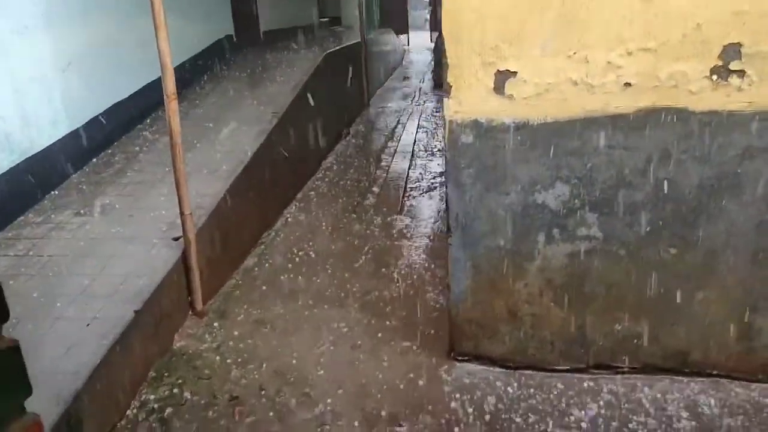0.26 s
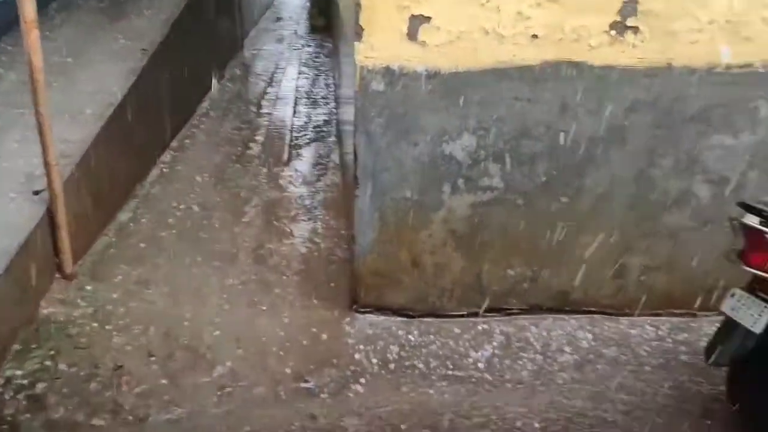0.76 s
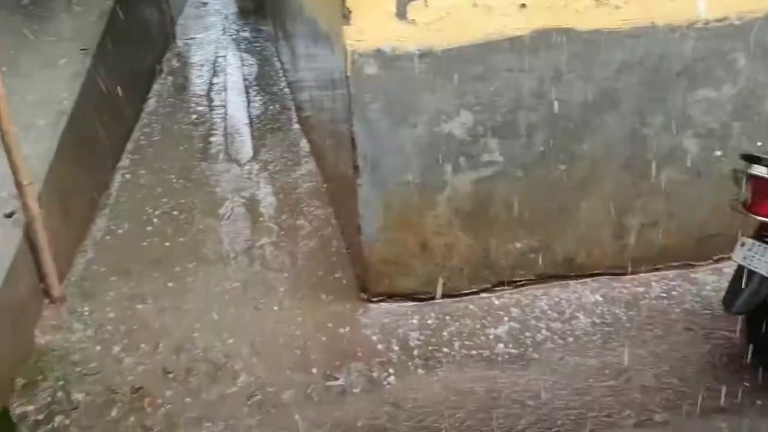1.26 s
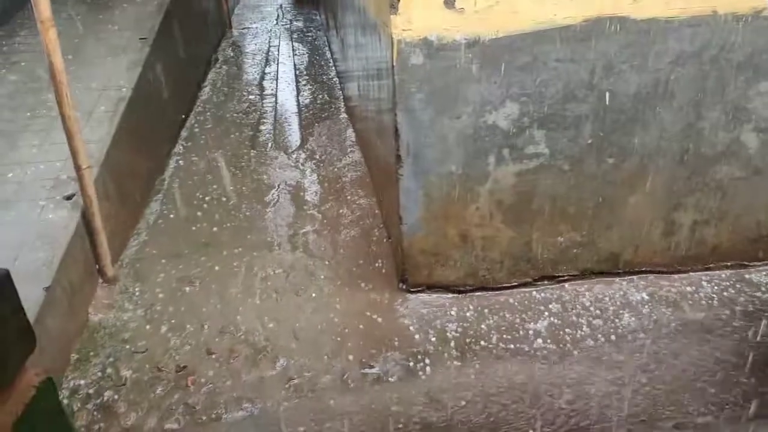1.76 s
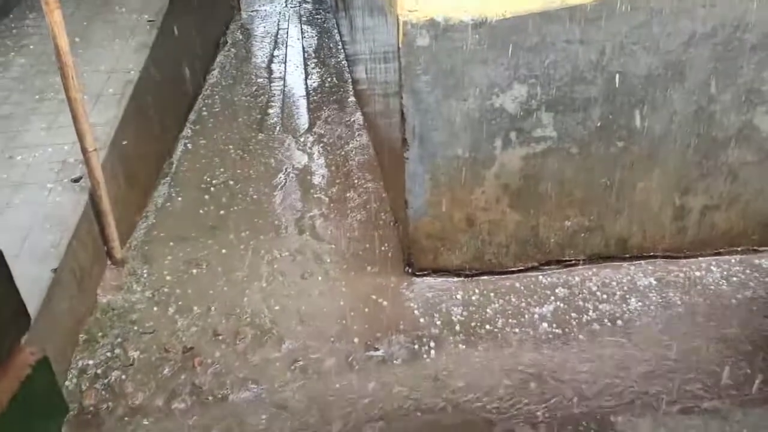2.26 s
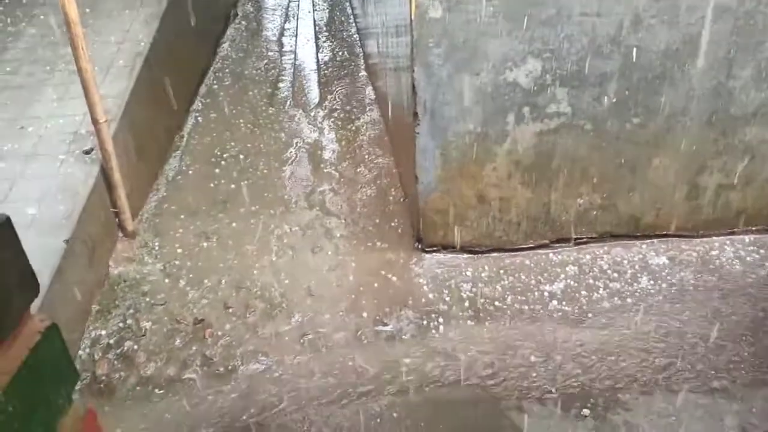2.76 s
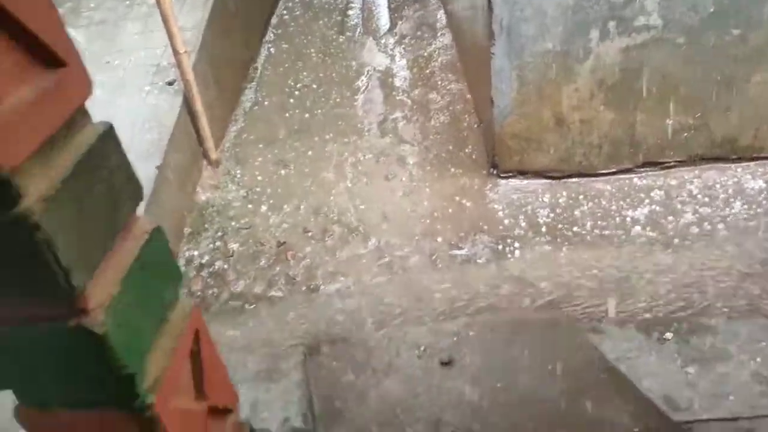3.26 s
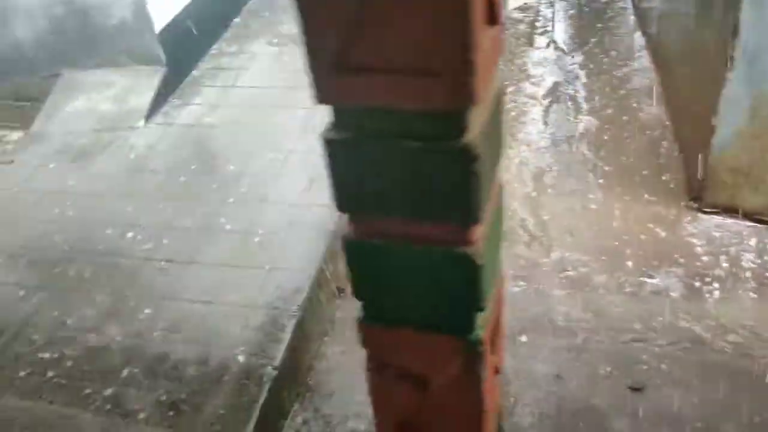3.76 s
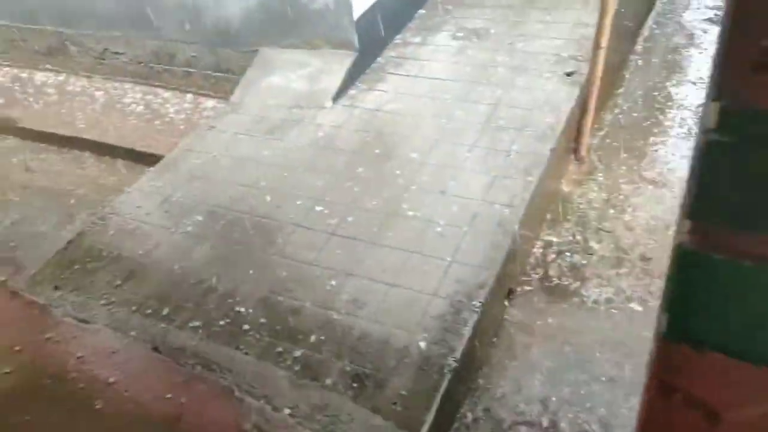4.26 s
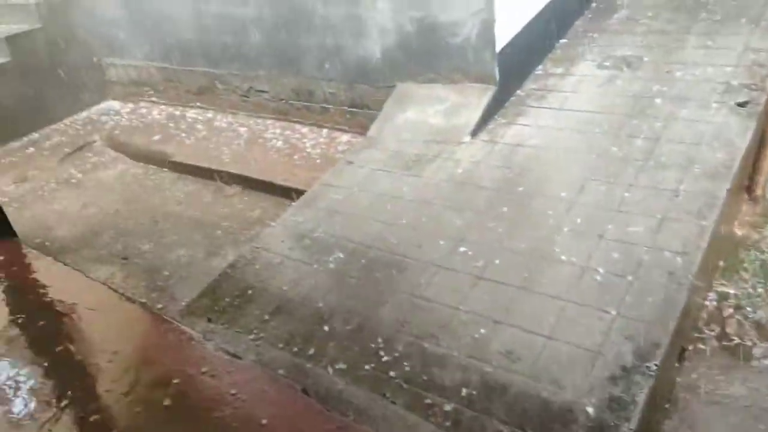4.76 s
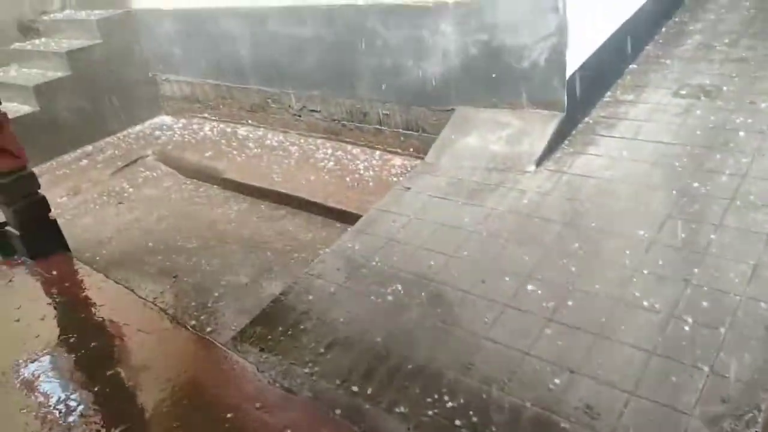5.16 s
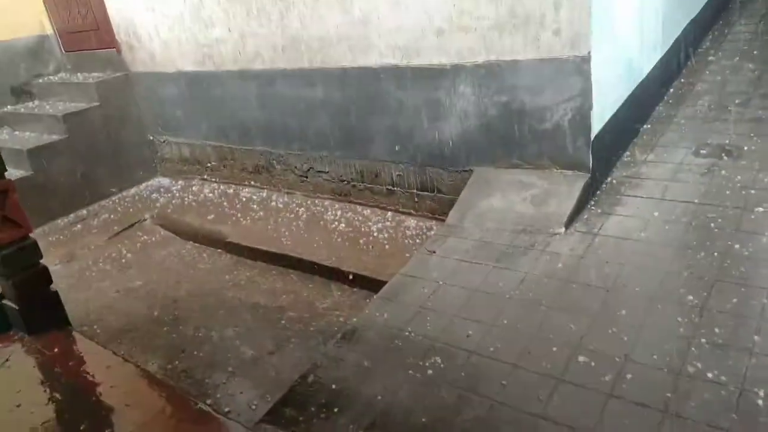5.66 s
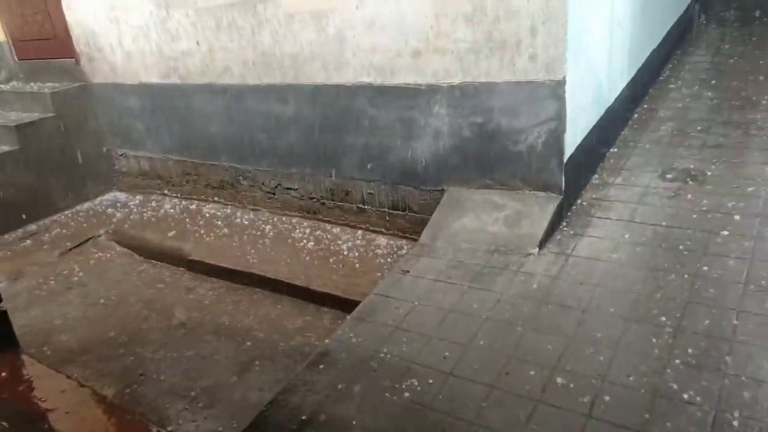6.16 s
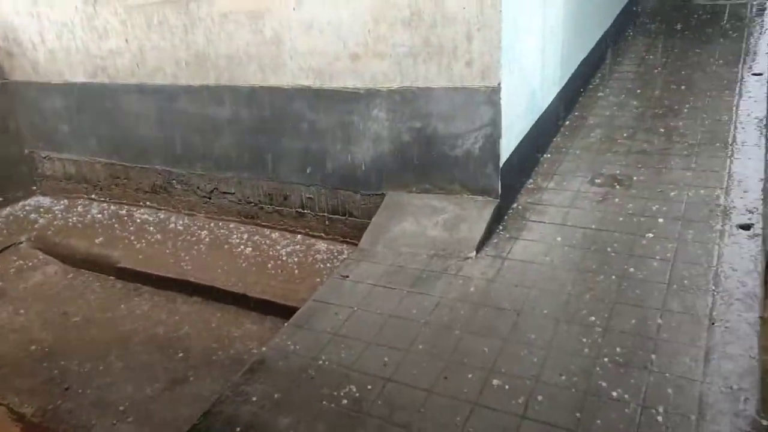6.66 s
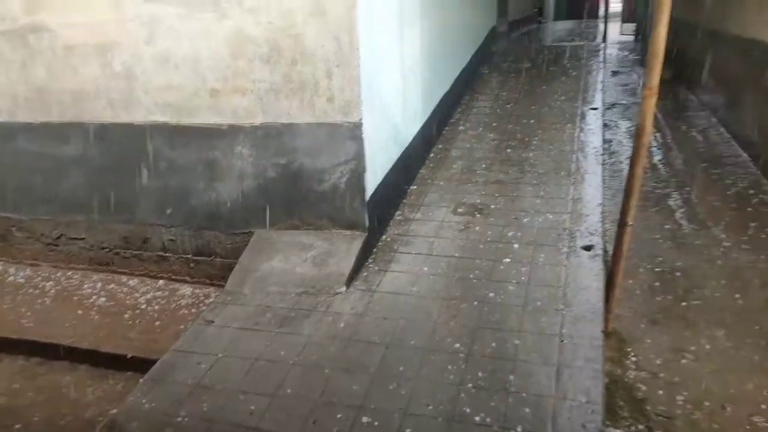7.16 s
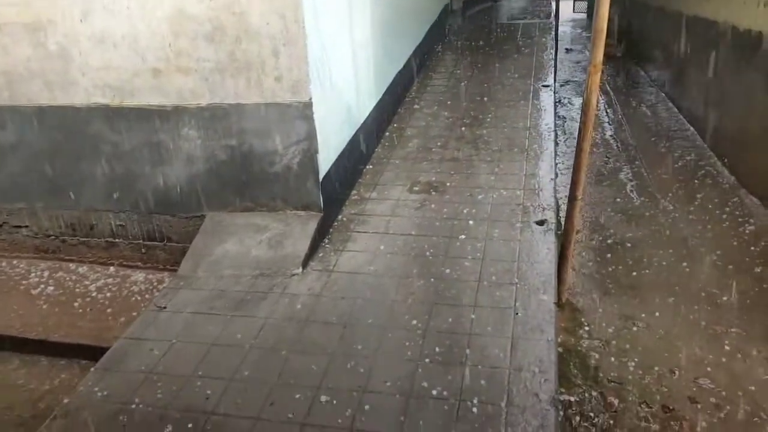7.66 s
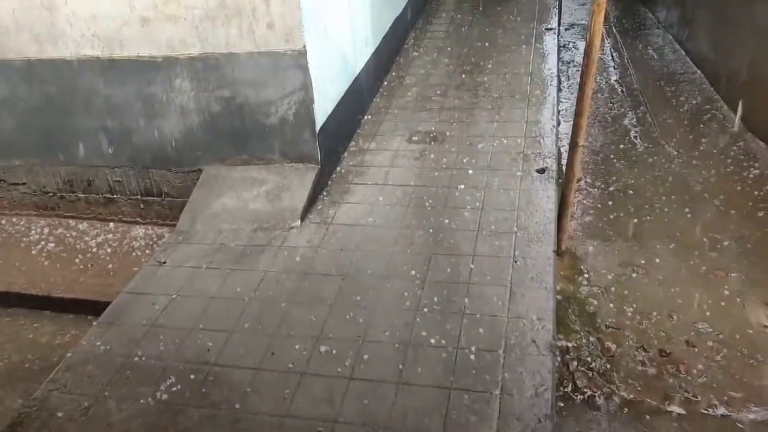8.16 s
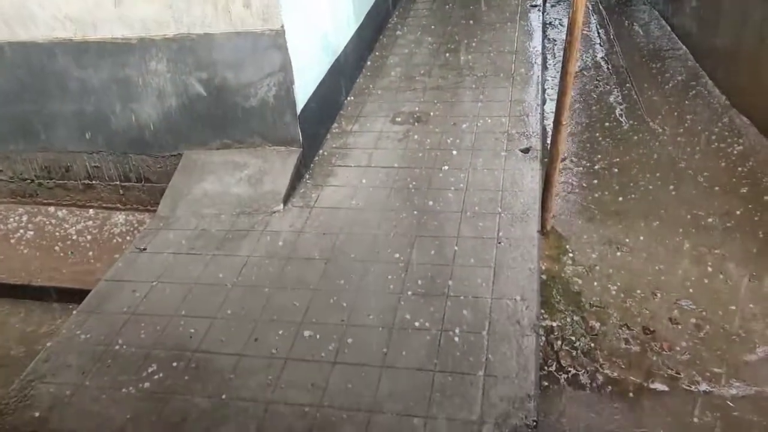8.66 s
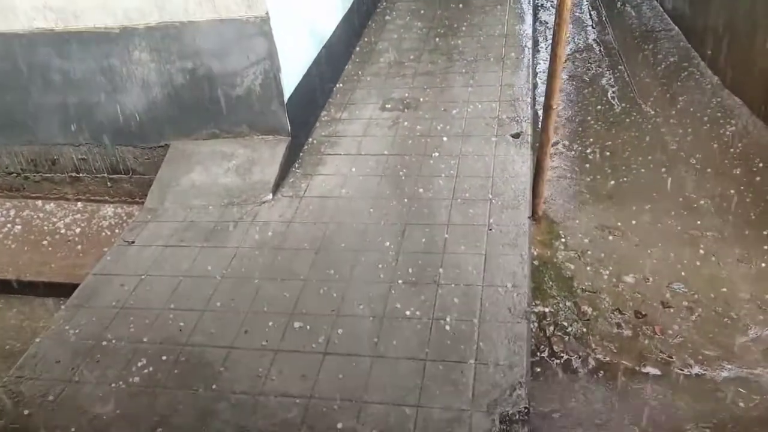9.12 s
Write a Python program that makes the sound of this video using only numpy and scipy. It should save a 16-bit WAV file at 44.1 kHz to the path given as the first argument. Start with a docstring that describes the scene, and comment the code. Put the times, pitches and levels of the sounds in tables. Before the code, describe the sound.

A hailstorm heard from a porch: constant rushing rain, pattering small stones, loud crisp hits nearby and occasional low thumps against the microphone.

```python
"""Hail and rain on a concrete yard

Heavy rain and hail fall on a wet concrete yard, heard from a porch between house walls.
Near stones are filtered noise bursts: crack, splash, scattered chips. Small stones and drops patter behind.
Filtered noise makes the rain wash; sparse decaying reflections make the echo of the walls.
Listed hard hits push the microphone into a low thump; loud sound ducks its gain and overloads it.
"""
import sys
import numpy as np
from scipy import signal
from scipy.fft import rfft, irfft, next_fast_len
from scipy.io import wavfile
from scipy.ndimage import uniform_filter1d

SR = 44100
rng = np.random.default_rng(int(sys.argv[2]) if len(sys.argv) > 2 else 0)


def master(y):
    """Save y as 16-bit WAV."""
    cut = np.clip(np.atleast_2d(y).T, -1, 1)
    pcm = np.round(cut * 32767)  # scale
    wavfile.write(sys.argv[1], SR, pcm.astype(np.int16))


N = 414089

# swells of the downpour, used relative to each column's mean: start_s, body_db, hiss_db
DOWNPOUR_SWELLS = [(0.0, -23, -13), (0.2, -27.5, -17), (0.94, -28, -19.5), (1.39, -29, -17.5),
                   (2.2, -28.5, -17), (2.5, -32, -20.5), (2.85, -28.5, -20), (3.1, -30, -23.5),
                   (3.6, -31.5, -19.5), (4.8, -29.5, -18), (5.55, -31, -17), (5.85, -33.5, -20.5),
                   (6.28, -28.5, -17.5), (7.65, -31.5, -17.5), (7.95, -29, -14), (8.5, -29, -18.5),
                   (9.0, -27, -14), (9.39, -34, -23)]
# relative spectrum of rain on the whole yard: frequency_hz, density_db_per_hz
WASH_SPECTRUM = [(25, -17), (80, -14), (200, -9.5), (300, -5), (680, -1.5), (1030, 2), (1450, -0.5),
                 (2300, 1.5), (3000, 2.5), (3700, -0.5), (8000, -5.5)]
# resonances between the walls: frequency_hz, width_hz, lift_db
WALL_MODES = [(150.7, 36, 12.5), (299.6, 19, 6.5), (460, 43, 4.5), (575, 36, 1.5), (1040, 210, -2)]
# echo decay of the yard: frequency_hz, t60_s
ECHO_DECAY = [(150, 0.6), (1000, 0.52), (3000, 0.32), (8000, 0.44)]
# dull splashes in standing water: start_s, relative level_db, pitch_hz
PUDDLE_SPLASHES = [(.045, -20, 700), (.122, -20.5, 850), (0.344, -23, 1000), (.640, -25, 1060),
                   (1.286, -18.5, 1080), (2.150, -25, 895), (3.419, -26, 1250), (5.342, -22.5, 1100),
                   (5.378, -23.5, 700), (5.740, -22, 870), (5.819, -30, 408), (7.958, -21.5, 1080),
                   (8.545, -21.5, 764)]
# hits on something hollow out of sight: start_s, level_db
HOLLOW_KNOCKS = [(0.226, -43), (.39, -38), (2.346, -41), (3.009, -37), (4.391, -38), (5.414, -41),
                 (5.833, -37), (6.36, -31), (6.836, -34.5), (7.092, -38.5), (8.06, -40), (8.554, -33.5)]
# modes of the hollow body: nominal frequency_hz, relative level_db, t60_s
HOLLOW_MODES = [(150.8, 4.5, 0.32), (293, -4.5, 0.22), (443, -1, 0.18)]
# low thumps under the hardest hits: start_s, peak_db of the push at the microphone
MICROPHONE_THUMPS = [(1.516, -30), (2.895, -28), (3.019, -14), (3.526, -25.5), (4.133, -27), (4.684, -20),
                     (4.770, -5.5), (4.922, -21), (5.743, -12), (6.646, -9.5), (6.861, -28), (7.451, -27),
                     (7.812, -24.5), (8.213, -25), (8.298, -28), (8.425, -24), (8.562, -26), (8.94, -33),
                     (9.047, -23), (9.159, -28.5)]
# relative spectrum of ice on wet concrete: frequency_hz, density_db_per_hz
CRACK_SPECTRUM = [(40, -16.5), (200, -17), (350, -8.5), (680, -7.5), (1030, -2), (1450, -3), (2300, 1),
                  (3000, 1), (3700, 0), (8000, -2)]
# loudest stones near the porch: start_s, relative level_db, brightness_db_per_octave, crack pitch_hz
LOUD_STONES = [(0.209, -12, 0.5, 5120), (0.346, -6, 2.5, 950), (0.507, -14.5, -1.5, 5800),
               (0.637, -12, 0.5, 4950), (0.822, -10, 6, 2700), (1.088, -11, 2, 2900),
               (1.144, -12, -2.5, 7330), (1.163, -15, -2.5, 5360), (1.318, -13, -0.5, 2820),
               (1.37, -14.5, -2, 2110), (1.427, -14.5, -2, 7280), (1.513, -8, -1, 4900),
               (1.648, -14, -2, 6650), (1.694, -14, 0, 4950), (1.781, -12.5, 2, 2760),
               (1.981, -10.5, 0, 6500), (2.031, -12.5, 0, 6600), (2.07, -9.5, 0, 7100),
               (2.142, -11, -1, 2260), (2.404, -16, -1, 7190), (2.703, -10.5, -2, 5150),
               (2.754, -12, 2, 1720), (2.894, -6.5, 0.5, 2110), (2.913, -7, 2, 2650),
               (2.951, -9, -0.5, 4600), (2.988, -4.5, 5, 1810), (3.013, -3.5, 1.5, 5200),
               (3.033, -9, 2, 6370), (3.23, -15, -2, 6050), (3.404, -20, -5, 1620), (3.523, -5.5, 2, 3600),
               (3.596, -13, -3, 5980), (3.613, -13, -2.5, 5380), (3.693, -18, -3, 7300),
               (3.86, -8.5, 5.5, 3840), (4.002, -10.5, -1, 1920), (4.042, -16.5, -4, 2710),
               (4.127, -6, 1, 6340), (4.228, -14, -1, 5400), (4.311, -7, 4.5, 3360),
               (4.393, -12, -0.5, 4360), (4.442, -15, -3, 6200), (4.457, -7, 2, 3400), (4.678, -5, 3, 3600),
               (4.767, -5, 0, 4840), (4.877, -10.5, 2.5, 6400), (4.896, -9.5, -1.5, 2820),
               (4.92, -4, 4.5, 6100), (5.159, -13.5, 0.5, 4040), (5.343, -8.5, 4.5, 910),
               (5.689, -9, 1, 3880), (5.737, -6, -1.5, 4360), (5.805, -13, -2, 3480),
               (5.875, -16, -4, 5170), (6.038, -8.5, -2, 2410), (6.066, -6.5, 2.5, 2490),
               (6.143, -15, -1, 4350), (6.307, -7.5, 0.5, 4440), (6.339, -12, -2, 2730),
               (6.458, -12.5, -2, 4300), (6.645, -9.5, -3.5, 4250), (6.724, -13, 0.5, 4780),
               (6.799, -12, 2.5, 5600), (6.853, -8.5, -1, 2370), (6.894, -9.5, 0, 3030),
               (7.041, -16, 0, 7000), (7.081, -10.5, 1, 4240), (7.212, -12, -0.5, 3140),
               (7.312, -18, -3.5, 7300), (7.428, -12, -2.5, 2980), (7.451, -6, 4, 3320),
               (7.523, -8.5, 3.5, 5800), (7.651, -13.5, -1, 2330), (7.805, -5.5, 0.5, 7050),
               (7.95, -9, 0, 6370), (8.207, -4, 3, 3570), (8.294, -5, 3, 4040), (8.387, -5.5, 2.5, 3900),
               (8.417, -7, -1, 7120), (8.48, -9.5, 1, 3960), (8.538, -5.5, 3, 6800),
               (8.559, -7, -2.5, 6540), (8.937, -13.5, -1, 3700), (9.035, -6, 4, 3620),
               (9.06, -7.5, 2.5, 3190), (9.159, -8.5, 2.5, 3000), (9.198, -10, 1.5, 6460),
               (9.288, -5.5, 3.5, 2660), (9.382, -10, -3, 7280)]
# microphone colour: frequency_hz, gain_db
MICROPHONE_RESPONSE = [(20, 1), (4000, 2), (4800, 2), (5600, 7.5), (6100, 9), (6600, 6), (7300, 2.5),
                       (7650, -3.5), (8000, -17.5), (8400, -30.5)]

BAND_EDGE_HZ = 8366
# lesser near stones, at random times
LESSER_PER_S, LESSER_DB, LESSER_SPREAD_DB = 4, -19.5, 3
LESSER_BRIGHTNESS_DB_PER_OCTAVE, BRIGHTNESS_PER_FORCE_DB = -1.9, 0.74
LESSER_LOW_HZ, LESSER_HIGH_HZ = 1610, 7000
# a light push creeps back in about LIGHT_THUMP_DECAY_S; above THUMP_SNAP_DB it snaps back ever faster
LIGHT_THUMP_DECAY_S, THUMP_SNAP_DB, THUMP_SNAP_POWER = 0.026, -21, 1.85
CHIP_DB, CHIP_SPAN_S, CHIP_DECAY_S, CHIP_FADE_DB_PER_S = -10.5, 0.035, 0.0016, 251.5


def gain_of(db):
    """Decibels to amplitude."""
    return 10 ** (np.asarray(db) / 20)


def evened(x):
    """Scales to an rms of one."""
    return x / np.sqrt(np.mean(x ** 2) + 1e-20)


def read(points, hz):
    """Interpolates a table on a log-frequency axis."""
    f, value = np.transpose(points)
    return np.interp(np.log(hz + 1), np.log(f + 1), value)


def add(mix, start_s, sound):
    """Mixes a sound in at a time."""
    part = mix[max(round(start_s * SR), 0):][:len(sound)]
    part += sound[:len(part)]


def coloured(x, db_at):
    """Filters by a function from Hz to dB."""
    size = next_fast_len(len(x) + 512)
    gain = gain_of(db_at(np.fft.rfftfreq(size, 1 / SR)))
    return irfft(rfft(x, size) * gain, size)[:len(x)]


def wall_modes_db(hz):
    """Lift or dip that the walls give around a few frequencies."""
    return sum(db / (1 + (2 * (hz - f) / width) ** 2) for f, width, db in WALL_MODES)


def downpour_db(hz, t, crossover_hz=1700):
    """Swell level by time and frequency: low sounds follow the body of the rain, high ones its hiss."""
    s, body_db, hiss_db = np.transpose(DOWNPOUR_SWELLS)
    high = 1 / (1 + (crossover_hz / (hz + 1)) ** 4)
    body = np.interp(t, s, body_db - body_db.mean())
    hiss = np.interp(t, s, hiss_db - hiss_db.mean())
    return np.outer(body, 1 - high) + np.outer(hiss, high)


def wash(level_db=-21.5, patchy_db=1.54, flicker_db=2.5):
    """Countless far drops merge into a flickering hiss, patchy in time and frequency."""
    hz, t, z = signal.stft(rng.standard_normal(N), SR, nperseg=1024, noverlap=768)
    patches = uniform_filter1d(rng.standard_normal(z.T.shape), size=8, axis=0)
    patches = evened(uniform_filter1d(patches, size=16, axis=1))
    flicker = rng.standard_normal((len(t), 1))  # one value per frame, all frequencies
    field_db = read(WASH_SPECTRUM, hz) + wall_modes_db(hz) + downpour_db(hz, t)
    field_db = field_db + patchy_db * patches + flicker_db * flicker
    hiss = signal.istft(z * gain_of(field_db).T, SR, nperseg=1024, noverlap=768)[1][:N]
    return gain_of(level_db) * evened(hiss)


def yard(x, build_s=0.0069, bass_db=3):
    """Sparse reflections off walls and ground build up, then decay at a rate set by frequency."""
    taps = np.zeros(SR)
    at = np.arange(0, SR - 20, 20)
    taps[at + rng.integers(0, 20, len(at))] = rng.choice([-1., 1.], len(at))
    taps *= 1 - np.exp(-(np.arange(SR) / SR / build_s) ** 2)
    hz, t, z = signal.stft(taps, SR, nperseg=256)
    bass_lift_db = bass_db / (1 + (hz / 1500) ** 2)
    fall_db = bass_lift_db[:, None] - 60 * t / read(ECHO_DECAY, hz)[:, None]
    tail = signal.istft(z * gain_of(fall_db), SR, nperseg=256)[1]
    return signal.fftconvolve(x, tail / np.linalg.norm(tail))[:N]


def chips(t, count=4):
    """Envelope of the fragments that skitter after a hit, weaker the later they land."""
    out = np.zeros(len(t))
    for delay_s in CHIP_SPAN_S * rng.random(count):
        since = np.maximum(t - delay_s, 0) / CHIP_DECAY_S
        attack = np.minimum(since * np.e ** 2, 1)
        out += gain_of(CHIP_DB - CHIP_FADE_DB_PER_S * delay_s) * attack * np.exp(-since)
    return out


def impact(tilt_db, pitch_hz, ring_db, decay_s, rise_s, splash_db, splash_decay_s=0.029,
           ring_octaves=0.14, grit=0.23, shatters=False):
    """One hit: a gritty noise crack that dies in milliseconds, then a softer spray of chips and water."""
    t = np.arange(3584) / SR
    noise, sizes = rng.standard_normal((2, len(t)))
    grains = noise * np.exp(grit * evened(uniform_filter1d(sizes, size=14)))
    fall = np.exp(-t / decay_s) + gain_of(splash_db) * np.exp(-t / splash_decay_s)
    shape = (1 - np.exp(-t / rise_s)) * fall
    if shatters:
        shape = shape + chips(t)

    def colour_db(f):
        slope = tilt_db * np.log2(np.maximum(f, 1400) / 3000)  # tilt in dB per octave
        ring = ring_db * np.exp(-0.5 * (np.log2((f + 1) / pitch_hz) / ring_octaves) ** 2)
        return read(CRACK_SPECTRUM, f) + slope + ring

    sound = coloured(grains * shape, colour_db)
    return sound / np.sqrt(np.mean(sound[:512] ** 2))  # unit rms at the onset


def raindrops(level_db=-28, per_s=900, spread_db=4, count=48):
    """Drops and ice crumbs tick on wet ground, each decaying in about half a millisecond."""
    out = np.zeros(N)
    for hz in np.geomspace(1100, 7000, count):
        when, chance, size, sign = rng.random((500, 4)).T
        strength = np.minimum(-np.log(1 - size), 3)
        drop_db = spread_db * strength + downpour_db(np.array([hz]), when * N / SR)[:, 0]
        lands = chance < per_s * N / SR / count / len(when)
        train = np.zeros(N)
        train[(when * N).astype(int)] = np.sign(sign - 0.5) * gain_of(drop_db) * lands
        tick = impact(np.log2(hz / 3000), hz, ring_db=4, decay_s=0.0005, rise_s=0.0003, splash_db=-60)
        out += signal.oaconvolve(train, tick[:256])[:N]
    return gain_of(level_db) * evened(out)


def far_stones(level_db=-27, per_s=60, spread_db=1.0, ring_db=4):
    """Stones across the yard, each with its own strength and pitch, attacks blurred by distance."""
    out = np.zeros(N)
    for when, chance, size, pitch in rng.random((1200, 4)):
        if chance < per_s * N / SR / 1200:
            s, octaves = when * N / SR, 2.8 * pitch - 1.55
            hz = 3000 * 2 ** octaves
            db = spread_db * min(-np.log(1 - size), 2.5) + downpour_db(np.array([hz]), s).item()
            hit = impact(octaves, hz, ring_db, decay_s=0.0038, rise_s=0.0017, splash_db=-24)
            add(out, s, gain_of(db) * hit)
    return gain_of(level_db) * evened(out)


def knocks(rise_s=0.0064, detune=0.011):
    """A hollow body booms softly as decaying sines, detuned a little at each strike."""
    out, t = np.zeros(N), np.arange(SR // 2) / SR
    for s, db in HOLLOW_KNOCKS:
        for hz, mode_db, t60_s in HOLLOW_MODES:
            struck_hz = hz * (1 + detune * rng.uniform(-1.1, 1))
            tone = np.sin(2 * np.pi * (struck_hz * t + rng.random()))
            add(out, s, tone * (1 - np.exp(-t / rise_s)) * gain_of(db + mode_db - 60 * t / t60_s))
    return out


def splashes(level_db=-1, width_octaves=1.0, decay_s=0.016, rise_s=0.0034):
    """A stone drops into a puddle: a short low slap of band-shaped noise."""
    out, t = np.zeros(N), np.arange(4096) / SR
    for s, db, hz in PUDDLE_SPLASHES:
        burst = rng.standard_normal(len(t)) * (1 - np.exp(-t / rise_s)) * np.exp(-t / decay_s)
        slap = coloured(burst, lambda f: -20 * np.log10(1 + (np.log2((f + 1) / hz) / width_octaves) ** 2))
        add(out, s, gain_of(db + level_db) * slap / np.sqrt(np.mean(slap[:1024] ** 2)))
    return out


def thumps(rise_s=0.00046, rise_share=0.065, knock_db=-12, knock_growth=1.2, knock_hz=760,
           knock_decay_s=0.0056):
    """A hard hit pushes the microphone off centre: light creeps back, heavy pops; a dull knock joins."""
    out, t = np.zeros(N), np.arange(8192) / SR
    for s, db in MICROPHONE_THUMPS:
        decay_s = LIGHT_THUMP_DECAY_S / (1 + gain_of(db - THUMP_SNAP_DB) ** THUMP_SNAP_POWER)
        push = (1 - np.exp(-(t / (rise_s + rise_share * decay_s)) ** 2)) * np.exp(-t / decay_s)
        add(out, s, -gain_of(db) * push / push.max())
        noise = rng.standard_normal(len(t))
        knock = evened(coloured(noise, lambda f: -10 * np.log10(1 + (f / knock_hz) ** 4)))
        knock_shape = (1 - np.exp(-t / rise_s)) * np.exp(-t / knock_decay_s)
        add(out, s, gain_of(knock_db + knock_growth * db) * knock * knock_shape)
    return out


def lesser_stones(count=120):
    """Draws middling stones as LOUD_STONES rows: stronger in the swells, brighter the harder they hit."""
    rows = []
    for when, chance, size, pitch in rng.random((count, 4)):
        if chance < LESSER_PER_S * N / SR / count:
            s, hz = when * N / SR, LESSER_LOW_HZ * (LESSER_HIGH_HZ / LESSER_LOW_HZ) ** pitch
            force_db = LESSER_SPREAD_DB * (2 * size - 1) + downpour_db(np.array([hz]), s).item()
            tilt_db = LESSER_BRIGHTNESS_DB_PER_OCTAVE + BRIGHTNESS_PER_FORCE_DB * force_db
            rows.append((s, LESSER_DB + force_db, tilt_db, hz))
    return rows


def near_stones(level_db=-2, bright_db=-0.44, spray_db=-2, spray_tilt_db=-1.0,
                hardness_per_db=0.1486, soak_db=0.67):
    """Stones close to the porch: the crack that arrives straight, and the spray that goes to the walls."""
    straight, spray = np.zeros((2, N))
    for s, db, tilt_db, hz in [*LOUD_STONES, *lesser_stones()]:
        # bright: bare concrete, short and dry; dull: water, slower
        slow = np.exp(-hardness_per_db * tilt_db)
        # low cracks give a clearly pitched tock, high ones tick
        tock_db = 3 + 6 / (1 + (hz / 3200) ** 6)
        crack = impact(tilt_db + bright_db, hz, tock_db, decay_s=0.008 * slow, rise_s=0.0012 * slow ** 2,
                       splash_db=-16, ring_octaves=0.13, shatters=True)
        add(straight, s, gain_of(db) * crack)
        # the brighter the crack, the weaker its spray
        wall_db = db - soak_db * tilt_db
        scatter = impact(tilt_db / 2 + spray_tilt_db, hz, ring_db=3, decay_s=0.006, rise_s=0.00091,
                         splash_db=-13.5)
        add(spray, s, gain_of(wall_db) * scatter)
    return gain_of(level_db) * straight, gain_of(spray_db) * spray


def gain_control(x, threshold_db=-11.5, squeeze=0.19, held_fall_db_per_s=45, makeup_db=0.44):
    """Turns the level down after a loud sound and lets it recover as the held peak falls."""
    power = signal.lfilter(np.ones(220) / 220, 1, x ** 2)  # 5 ms mean
    fall_db = np.arange(N) / SR * held_fall_db_per_s
    held_db = np.maximum.accumulate(10 * np.log10(abs(power) + 1e-12) + fall_db) - fall_db
    return x * gain_of(makeup_db - squeeze * np.maximum(held_db - threshold_db, 0))


def scene(near_echo_db=-3, far_echo_db=-3, splash_echo_db=-5):
    """Near and far hail and splashes with their echoes, over rain, knocks and thumps."""
    near, spray = near_stones()
    far, puddles = far_stones(), splashes()
    to_walls = gain_of(near_echo_db) * spray + gain_of(far_echo_db) * far
    echo = yard(to_walls + gain_of(splash_echo_db) * puddles)
    mix = near + far + puddles + knocks() + raindrops() + echo + wash() + thumps()
    return np.tile(mix, (2, 1))


def record(dry, knee=5.0):
    """One microphone with a treble peak, gain control, soft overload and a narrow band, on both channels."""
    heard = gain_control(coloured(dry.mean(0), lambda hz: read(MICROPHONE_RESPONSE, hz)))
    clipped = heard / (1 + abs(heard) ** knee) ** (1 / knee)
    low_pass = signal.firwin(511, BAND_EDGE_HZ, window=("kaiser", 9), fs=SR)
    return np.tile(signal.oaconvolve(clipped, low_pass, "same"), (2, 1))


dry = scene()
out = record(dry)
master(out)
```